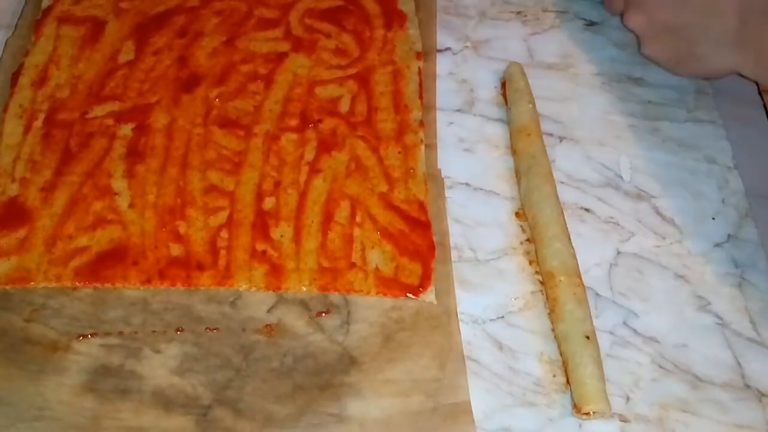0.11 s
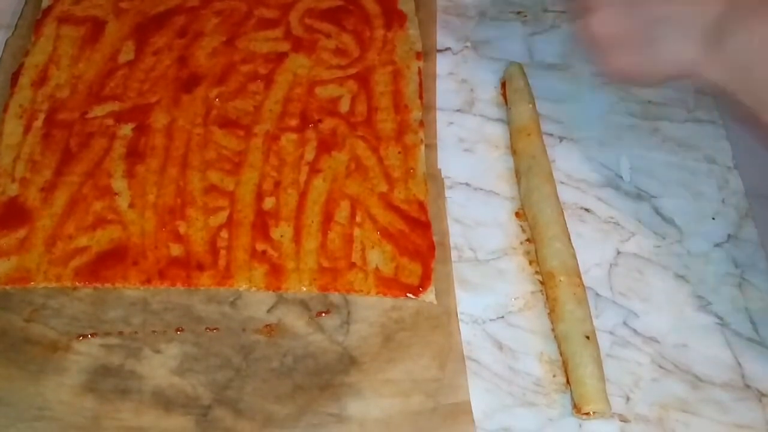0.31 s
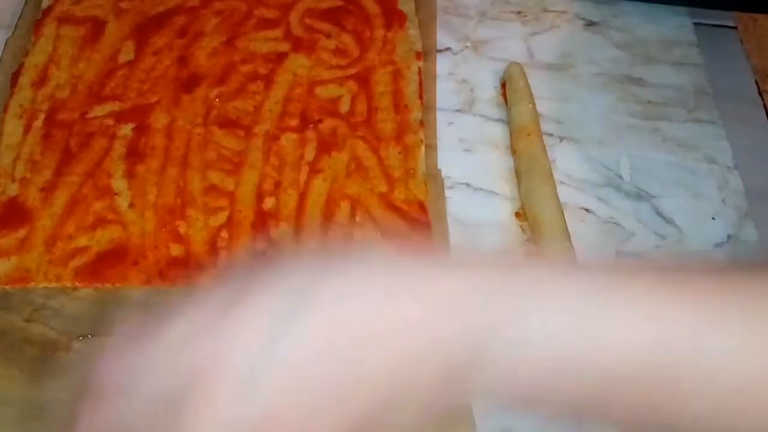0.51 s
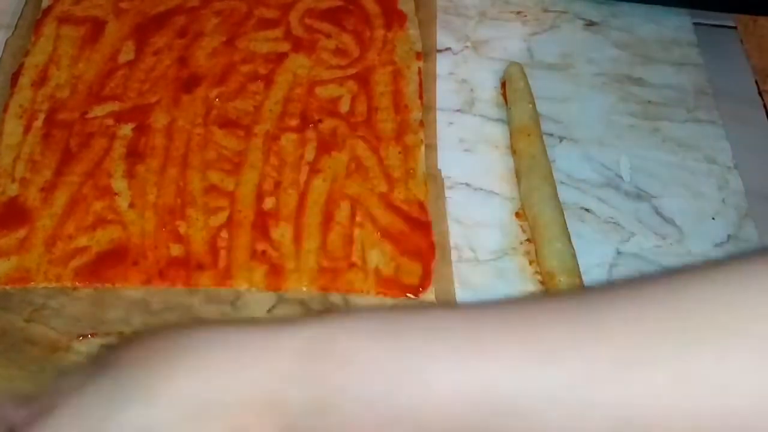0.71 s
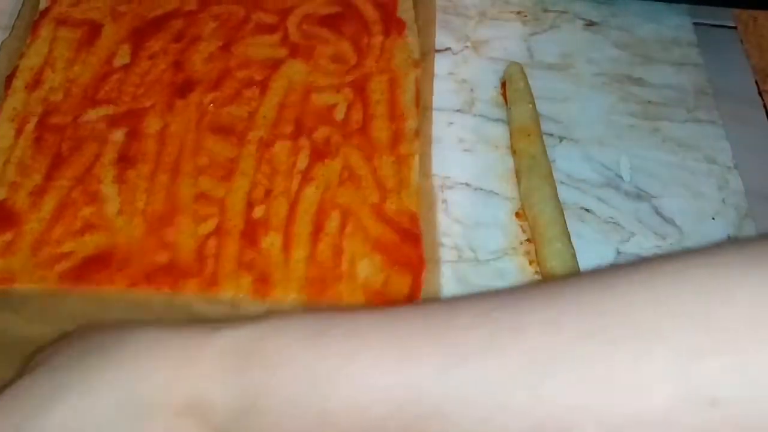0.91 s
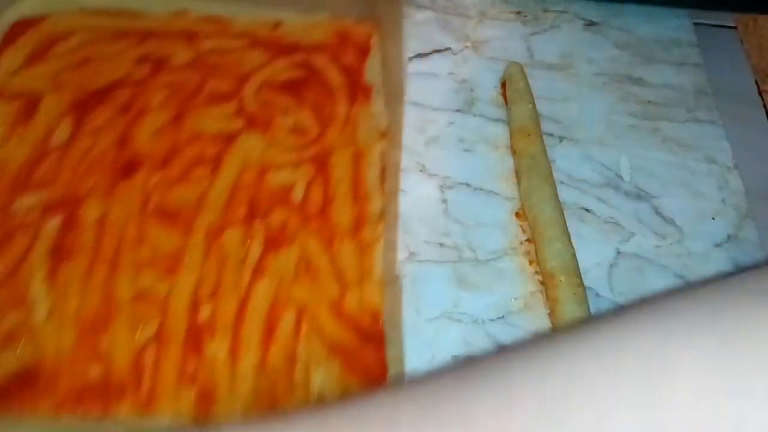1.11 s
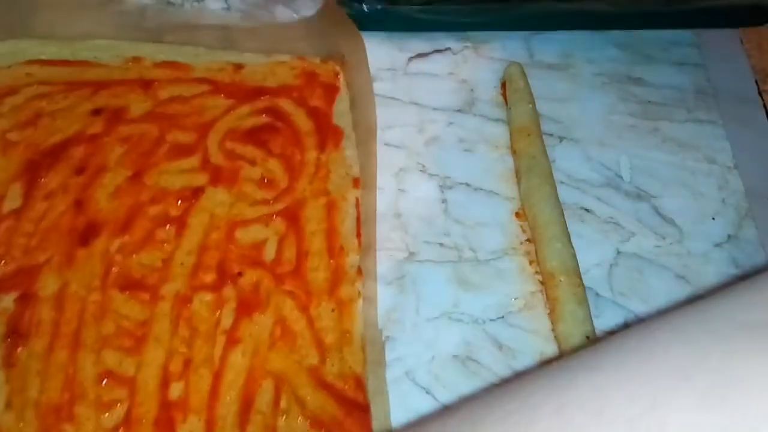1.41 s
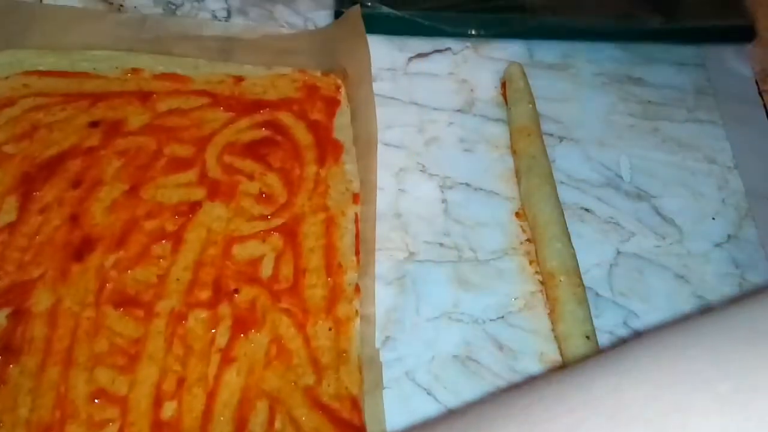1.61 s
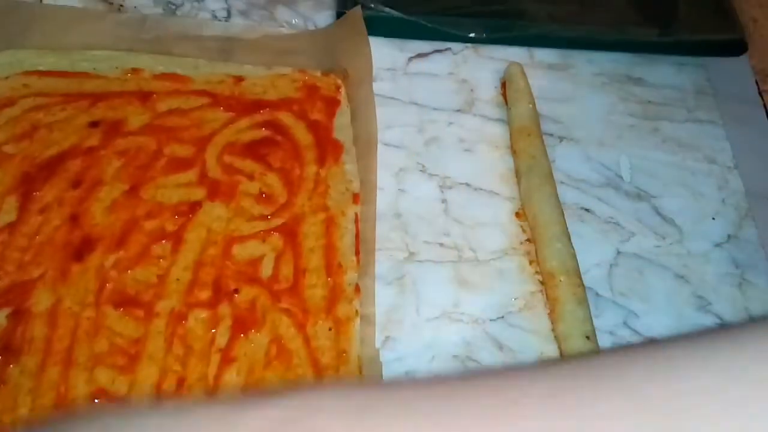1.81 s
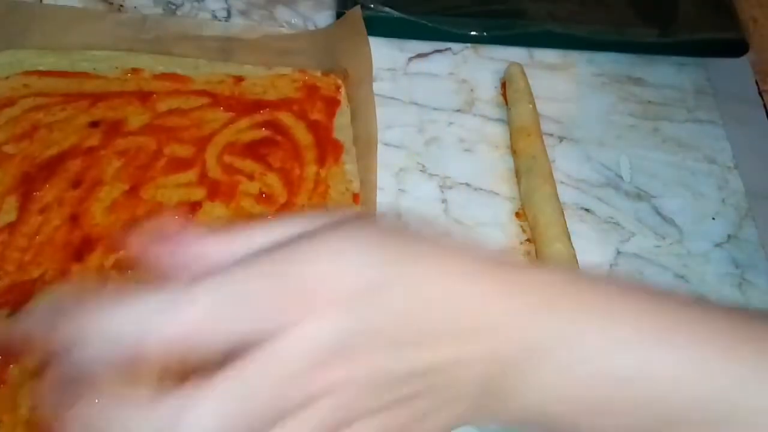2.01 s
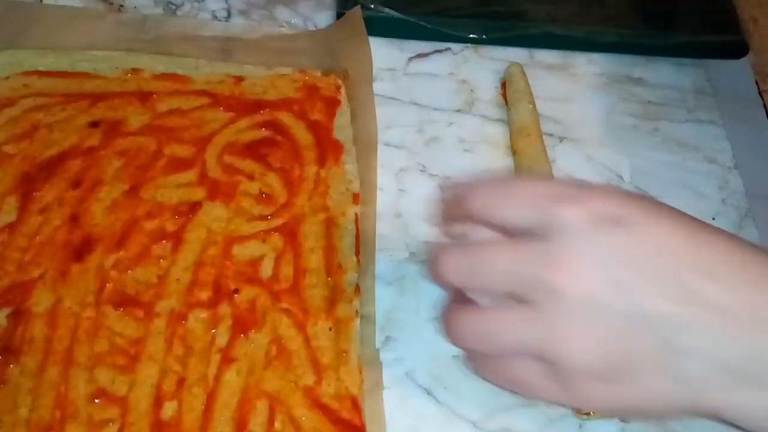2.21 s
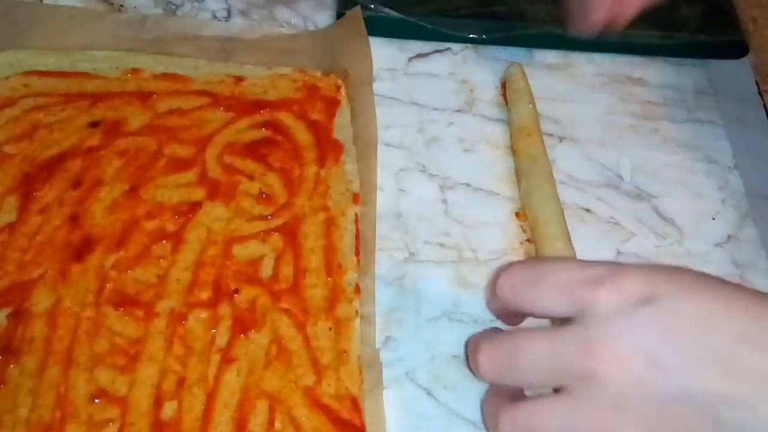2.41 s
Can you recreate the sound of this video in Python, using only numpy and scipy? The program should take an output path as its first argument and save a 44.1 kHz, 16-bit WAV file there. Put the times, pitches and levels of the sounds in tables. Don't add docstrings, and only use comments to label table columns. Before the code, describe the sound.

Baking paper sliding and crackling on a stone counter: a soft hiss at first while an earlier knock fades, then one sharp hard knock at 0.24 s ringing the kitchen for about half a second. From 0.7 s dry snaps and brushing strokes; from 1.2 to 2.1 s metal tray clacks and low thuds join, loudest near 1.83 s. Quiet follows, with light distant ticks around 2.27 and 2.42 s.

```python
import sys
import numpy as np
from scipy import signal
from scipy.fft import rfft, irfft, next_fast_len
from scipy.io import wavfile
from scipy.ndimage import uniform_filter1d, map_coordinates

SR = 44100
rng = np.random.default_rng(int(sys.argv[2]) if len(sys.argv) > 2 else 0)


def unload_audio(sound):
    columns = np.transpose(np.atleast_2d(sound))
    steps = np.round(np.clip(columns, -1, 1) * 32767)
    wavfile.write(sys.argv[1], SR, steps.astype(np.int16))


def voltage_ratio(level):
    return 10 ** (np.asarray(level, float) / 20)


N = 114660


def unit(x):
    return x / np.sqrt(np.mean(x ** 2) + 1e-20)


def along(points, hz):
    f, value = np.transpose(points)
    return np.interp(np.log(hz + 1), np.log(f + 1), value)


def filtered(x, response):
    size = next_fast_len(len(x) + 8192)
    hz = np.fft.rfftfreq(size, 1 / SR)
    return irfft(rfft(x, size) * response(hz), size)[:len(x)]


def noise(colour, size):
    return unit(filtered(rng.standard_normal(size), lambda hz: voltage_ratio(along(colour, hz))))


def banded(bands, size):
    def resonances(f):
        total = 0
        for k, (centre, width, db) in enumerate(bands):
            bandpass = 1j * f * width / (centre ** 2 - f ** 2 + 1j * f * width)
            total = total + (-1) ** k * voltage_ratio(db) * bandpass
        return total
    return unit(filtered(rng.standard_normal(size), resonances))


def wobble(rate):
    knots = rng.standard_normal(int(N * rate / SR) + 4)
    return map_coordinates(knots, [np.arange(N) * rate / SR])


def ring(modes, t, attack_s, scatter_db):
    hz, db, t60 = np.transpose(modes)[:, :, None]
    level_luck, pitch_luck = rng.standard_normal((2, len(modes), 1))
    decay = voltage_ratio(db + scatter_db * level_luck - 60 * t / t60)
    tones = decay * np.sin(2 * np.pi * hz * (1 + 0.012 * pitch_luck) * t)
    return tones.sum(0) * (1 - np.exp(-t / attack_s))


# (frequency [Hz], t60 [s])
KITCHEN_T60 = [(100, 0.47), (500, 0.43), (2000, 0.45), (6000, 0.47), (12000, 0.27), (15000, 0.22)]


def echo(x, swell_s):
    hz, t, z = signal.stft(x, SR, nperseg=256)
    fade = voltage_ratio(-60 * t / along(KITCHEN_T60, hz)[:, None])
    swell = 1 - np.exp(-t / swell_s)
    return signal.istft(z * fade * swell, SR, nperseg=256)[1]


def room(x, swell_s):
    tail = echo(rng.standard_normal(SR * 3 // 4), swell_s)
    return signal.fftconvolve(x, tail / np.linalg.norm(tail))


def add(track, s, x):
    i = round((s + 1) * SR)
    track[i:i + len(x)] += x[:len(track) - i]


# (time [s], peak level [dB], fold note [Hz], body level [dB], length [s])
FOLD_SNAPS = [(0.1905, -49.5, 9010, -8, .004), (0.68, -59, 6500, -38, 0.015),
              (0.6957, -38, 6850, -47.5, 0.0053), (0.7525, -40, 5950, -33, .005),
              (0.7612, -37, 5060, -45, .005), (0.7816, -39, 3180, -11.5, .004),
              (0.786, -35.5, 5680, -7.5, .006), (0.7976, -31, 6100, -44, .007),
              (0.8065, -41.5, 6530, -32, 0.004), (0.82, -37, 6370, -4.5, 0.0031),
              (0.8395, -37, 3046, -10.5, .008), (0.8775, -34.5, 4700, -12, 0.0031),
              (0.8825, -47.5, 6650, -4, 0.0015), (0.9577, -46, 7300, -29, 0.0027),
              (1.037, -37.5, 3756, -30, 0.0016), (1.1159, -34.5, 5300, -6, 0.0023),
              (1.1294, -35.5, 3000, 1.5, 0.0021), (1.1644, -40, 2420, -1.5, .01),
              (1.237, -41, 6400, -21, .004), (1.25, -45.5, 6400, -14.5, .01), (1.3034, -50, 5710, -3, .003),
              (1.319, -43.5, 6300, 3.5, .002), (1.3482, -32, 6100, -10.5, 0.0019),
                (1.3705, -43.5, 3170, 0, 0.0043), (1.3917, -36.5, 3220, 2, 0.013),
                (1.4128, -29.5, 5200, -4, 0.0087), (1.4292, -24.5, 6200, -10.5, 0.011),
                (1.5034, -44, 6600, -1, 0.0086), (1.549, -45.5, 6500, 2, .003),
                (1.573, -39.5, 7400, -4, 0.011), (1.5895, -37, 3970, -26, 0.0073),
                (1.61, -40.5, 6500, -13, 0.0013), (1.7027, -45, 3980, -4, 0.0037),
                (1.7438, -36, 5560, 1, 0.015), (1.7882, -40.5, 5700, 4.5, 0.0053),
                (1.938, -35.5, 3550, -25, 0.0037), (2.037, -52, 3000, -11, 0.018)]
# (time [s], peak level [dB], t60 [s])
AIR_TICKS = [(.14, -60, .03), (.1905, -58.5, 0.025), (.6957, -53, 0.066), (.786, -63, 0.034),
             (.82, -51.5, 0.018), (1.037, -67, 0.038), (1.1294, -62.5, .03), (1.3485, -60, .04),
             (1.4126, -61.5, 0.063), (1.4306, -52, 0.052), (1.505, -60, 0.052), (1.5483, -62, 0.013),
             (1.5877, -54.5, 0.12), (1.7474, -61, .05), (2.05, -65, 0.033)]
# (frequency [Hz], level [dB per Hz])
SNAP_COLOUR = [(1470, -24.5), (2500, -7.5), (3890, -1.5), (4130, -7), (6430, 1.5), (9500, -13.5),
               (12400, -51), (20900, -120)]
SNAP_BODY = [(300, -25), (600, -8.5), (1400, -2), (2400, 2.5), (3500, -38)]
SNAP_AIR = [(8000, -44), (9500, 7.5), (13300, -9.5), (14800, 4.5), (15800, 0.5)]


def snaps():
    track, t = np.zeros(N + SR), np.arange(SR // 8) / SR
    rise_s, t60_s = .0006, .018
    fold_db, fold_q = -1, 3.5
    paper_top_hz, room_db = 10300, -9.5
    for s, db, fold_hz, body_db, length_s in FOLD_SNAPS:
        burst = noise(SNAP_COLOUR, len(t)) + voltage_ratio(body_db) * noise(SNAP_BODY, len(t))
        burst = burst + voltage_ratio(fold_db) * banded([(fold_hz, fold_hz / fold_q, 0)], len(t))
        burst = filtered(burst, lambda hz: 1 / (1 + (hz / paper_top_hz) ** 6))
        grit = voltage_ratio(1.5 * unit(uniform_filter1d(rng.standard_normal(len(t)), size=30)))
        front_db = 6 * np.exp(-t / .002)
        fade_db = -60 * np.maximum(t - length_s, 0) / t60_s
        shape = voltage_ratio(db - 7.5 + front_db + fade_db) * (1 - np.exp(-t / rise_s))
        snap = shape * grit * burst
        add(track, s, snap)
        add(track, s, voltage_ratio(room_db) * room(snap, 0.0027))
    for s, db, t60 in AIR_TICKS:
        add(track, s, voltage_ratio(db - 60 * t / t60) * noise(SNAP_AIR, len(t)))
    return track[SR:]


# (time [s], hiss level [dB], drag level relative to hiss [dB])
STROKES = [(0, -55.5, -22.5), (.23, -55, -15.5), (.4, -81, -25), (.67, -96, -23), (.72, -64, -30.5),
           (0.802, -45.5, -7.5), (.9, -49, -11), (1.088, -49, -23), (1.188, -42.5, -8.5), (1.32, -45, -15),
           (1.5, -58, 3.5), (1.701, -49.5, -8), (1.851, -58, -15), (2.1, -80.5, -13.5), (2.6, -85, 4)]
# (frequency [Hz], level [dB per Hz])
HISS = [(710, -38), (1200, -21), (1970, -4), (4430, -5.5), (6520, 1), (12300, -25), (13900, -31),
        (14800, -13.5), (15800, -19.5)]
DRAG = [(200, -5), (700, -6.5), (1500, -4.5), (3000, -11.5), (5000, -31.5)]


def slide():
    s, level_db, low_db = np.transpose(STROKES)
    t = np.arange(N) / SR
    crinkles_per_s, crinkle_s, crinkle_db, spread_db = 250, .006, -6, 3
    sparks = rng.random(N) < crinkles_per_s / SR
    sparks = sparks * voltage_ratio(spread_db * np.minimum(rng.exponential(size=N), 3))
    grains = signal.lfilter([1], [1, -np.exp(-7 / (crinkle_s * SR))], sparks)
    roughness = voltage_ratio(2.5 * wobble(40)) + voltage_ratio(crinkle_db) * unit(grains)
    rough = rng.standard_normal(N) * roughness
    hiss = unit(filtered(rough, lambda hz: voltage_ratio(along(HISS, hz))))
    drag = noise(DRAG, N) * voltage_ratio(np.interp(t, s, low_db) + 3.5 * wobble(30))
    return voltage_ratio(np.interp(t, s, level_db) - 2) * (hiss + drag)


# (time [s], peak level [dB], upper mode level [dB])
CLACKS = [(1.237, -38.5, -7.5), (1.247, -41.5, 7), (1.35, -37.5, 3), (1.392, -31.5, 1.5), (1.41, -36.5, 8),
          (1.5135, -30.5, 4.5), (1.588, -31.5, -4.5), (1.703, -32, 4.5), (1.719, -29, -4), (1.734, -31, -2),
          (1.788, -34.5, 7.5), (1.81, -30.5, 1), (1.8295, -20.5, 1), (1.853, -30, 0), (1.869, -31, -5.5),
          (1.9385, -29, 0.5), (1.964, -40.5, 3.5), (2.039, -36, -9), (2.062, -46, -1), (2.085, -43, -10)]
# (frequency [Hz], level [dB], t60 [s])
TRAY_LOW = [(608.6, -7, 0.082), (766, -5, 0.14), (809, -3.5, 0.14), (846.3, -7.5, 0.19), (982, -12, 0.045)]
TRAY_UPPER = [(1301, -15.5, 0.23), (1458, -12.5, 0.079), (1670, -27, .05), (1891, -10.5, .04),
              (2260, -23, 0.037), (3680, -13.5, 0.021)]
# (frequency [Hz], level [dB per Hz])
CLATTER = [(300, -28), (550, 6), (800, 10), (1000, 3.5), (1900, 5), (2700, -9), (3700, -4.5), (8000, -48)]


def tray():
    track, t = np.zeros(N + SR), np.arange(SR // 4) / SR
    clatter_db, clatter_t60_s, room_db = 0.5, 0.093, -10.5
    for s, db, upper_db in CLACKS:
        hit = ring(TRAY_LOW, t, .0018, scatter_db=2)
        hit = hit + voltage_ratio(upper_db) * ring(TRAY_UPPER, t, .0008, scatter_db=3)
        rattle = voltage_ratio(clatter_db + upper_db - 3.5 - 60 * t / clatter_t60_s) * (1 - np.exp(-t / 0.00044))
        hit = hit + rattle * noise(CLATTER, len(t))
        add(track, s, voltage_ratio(db - 7) * hit)
        add(track, s, voltage_ratio(db - 2.5 + room_db) * room(hit, 0.0034))
    return track[SR:]


# (time [s], peak level [dB], panel note level [dB])
THUDS = [(0.796, -63, 4.5), (1.239, -45, -0.5), (1.355, -43.5, 3), (1.502, -42.5, -16), (1.613, -44.5, 4.5),
         (1.649, -46.5, 8), (1.69, -47.5, -3.5), (1.821, -40, -8), (1.897, -40, -28), (2.054, -60, -31)]
# (frequency [Hz], level [dB], t60 [s])
SLAB = [(76.4, -19, 0.058), (100.7, -15, 0.4), (128, 1, 0.035), (291, -1.5, 0.039), (224, -5, 0.057)]
PANEL = [(157.2, -6.5, 0.37)]


def counter():
    track, t = np.zeros(N + SR), np.arange(SR // 3) / SR
    for s, db, panel_db in THUDS:
        slab = voltage_ratio(db - 3.0) * ring(SLAB, t, 0.0029, scatter_db=-0.5)
        panel = voltage_ratio(db + panel_db + 4.5) * ring(PANEL, t, 0.0041, scatter_db=0.5)
        add(track, s - .006, slab + panel)
        add(track, s, voltage_ratio(9.0) * room(slab, 0.0032))
    return track[SR:]


# (frequency [Hz], level [dB], t60 [s])
CRACK = [(1700, -11, .004), (2400, -10, .004), (3600, -10, .004)]
# (frequency [Hz], width [Hz], level [dB])
KNOCK_BANDS = [(1480, 70, -4.5), (2018, 280, 1.5), (3325, 360, -0.5), (5300, 990, -9.5), (6905, 520, -4)]
# (frequency [Hz], level [dB per Hz])
KNOCK_COLOUR = [(76, -53), (130, -4.5), (186, -8), (549, -8), (803, -4.5), (2180, -6), (4860, -14.5),
                (6430, -7.5), (12800, -43.5), (15000, -32.5)]
# (frequency [Hz], width [Hz], level [dB])
ECHO_RINGS = [(608, 7.5, 4.5), (784, 11, -6.5), (858, 18, -8.5), (992, 5.3, -4.5), (1250, 12, 1.5),
              (1573, 20, 2.5), (1630, 14, -7.5), (1933, 25, 1), (2240, 30, 0.5), (3500, 25, -1),
              (3616, 22, -0.5), (4020, 43, -1), (4280, 33, -4.5), (6690, 50, -6.5)]
# (frequency [Hz], level [dB], rise [s], t60 [s])
BOOM = [(92.4, -30, 0.057, 0.42), (554.4, -39, .01, .2), (201.3, -30, 0.027, 0.33),
        (802.5, -28.5, 0.022, .4)]
# (frequency [Hz], level [dB], t60 [s])
SETTLING_NOTE = (470, -62, 0.72)
# (frequency [Hz], level [dB per Hz])
EARLIER_COLOUR = [(40, -20), (105, -3), (430, -22.5), (700, -10), (2500, -25), (2830, -9.5), (3200, -20.5),
                  (12000, -34)]


def knocks():
    track, t = np.zeros(N + SR), np.arange(SR * 3 // 4) / SR
    knock_s, hold_s, t60_s = .2385, .008, .03
    knock_db, crack_db, echo_db = -18.5, 9, -22
    crack = ring(CRACK, t, .0002, scatter_db=0)
    crack = signal.sosfilt(signal.butter(2, 1500, 'high', fs=SR, output='sos'), crack)
    shape = voltage_ratio(-60 * np.maximum(t - hold_s, 0) / t60_s)
    add(track, knock_s, voltage_ratio(knock_db) * shape * banded(KNOCK_BANDS, len(t)))
    add(track, knock_s, voltage_ratio(crack_db) * crack)

    answer = noise(KNOCK_COLOUR, len(t))
    answer = answer + voltage_ratio(-3) * banded(KNOCK_BANDS, len(t))
    answer = answer + voltage_ratio(-3) * banded(ECHO_RINGS, len(t))
    far_wall_db = 2 * np.exp(-((t - .06) / .02) ** 2)
    answer = answer * voltage_ratio(far_wall_db + 1.5 * wobble(90)[:len(t)])
    add(track, knock_s, voltage_ratio(echo_db) * echo(answer, 0.032))
    for hz, db, rise_s, t60 in BOOM:
        add(track, knock_s, ring([(hz, db, t60)], t, rise_s, scatter_db=0))
    add(track, 0.5, ring([SETTLING_NOTE], t, 0.026, scatter_db=5.5))
    add(track, -.05, voltage_ratio(-37.5) * echo(noise(EARLIER_COLOUR, len(t)), .005))
    return track[SR:]


# (time [s], peak level [dB])
FAR_TICKS = [
    (2.2629, -53),
    (2.2786, -43.5),
    (2.421, -56.5),
]
# (frequency [Hz], width [Hz], level [dB])
FAR_BANDS = [(2000, 190, -11.5), (3030, 110, -0.5), (3450, 190, -15), (4740, 52, 1), (5200, 250, -9),
             (6200, 110, -2), (6540, 150, -7), (7150, 200, -8), (7660, 560, -15)]


def far_ticks():
    track, t = np.zeros(N + SR), np.arange(SR * 3 // 4) / SR
    for s, db in FAR_TICKS:
        contact = banded(FAR_BANDS, len(t)) + voltage_ratio(-4.5) * noise(SNAP_COLOUR, len(t))
        contact = unit(filtered(contact, lambda hz: 1 / (1 + (hz / 8000) ** 14)))
        tick = voltage_ratio(db - 8 - 60 * t / 0.042) * contact
        add(track, s, tick)
        add(track, s, voltage_ratio(6.5) * room(tick, 0.011))
    return track[SR:]


# (frequency [Hz], level [dB per Hz])
FLOOR = [(25, -31), (70, 3.5), (300, -3.5), (1300, -12), (6500, -19), (9500, -30), (13800, -26.5),
         (15300, -21)]


def room_floor():
    return voltage_ratio(-69.5 + 0.77 * wobble(18)) * noise(FLOOR, N)


def scene():
    paper = snaps() + slide()
    kitchen = tray() + counter() + knocks() + far_ticks() + room_floor()
    return np.tile(paper + kitchen, (2, 1))


def band_limit(x):
    return signal.sosfilt(signal.butter(12, 16670, fs=SR, output="sos"), x)


# (time [s], length [s])
APART = [(0.244, 0.0046), (0.689, 0.0052), (0.786, 0.033), (1.2, 0.018), (1.411, 0.01), (1.578, 0.029),
         (1.923, 0.034)]


def record(dry):
    low_cut_hz, top_hz = 44, 15750
    apart_hz, apart_db = 4600, -5
    mid = filtered(dry[0], lambda hz: (hz < top_hz) / (1 + (low_cut_hz / (hz + 1)) ** 4))
    hz, t, z = signal.stft(mid, SR, nperseg=256)
    gate = voltage_ratio(apart_db) * sum((t >= s) * (t < s + length_s) for s, length_s in APART)
    treble = z * gate * (hz > apart_hz)[:, None]
    turned = treble * np.exp(2j * np.pi * rng.random(z.shape))
    side = signal.istft(turned, SR, nperseg=256)[1][:N]
    return band_limit(np.array([mid + side, mid - side]))


dry = scene()
out = record(dry)
unload_audio(out)
```